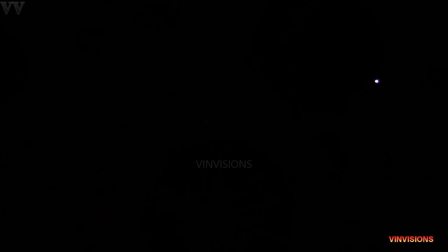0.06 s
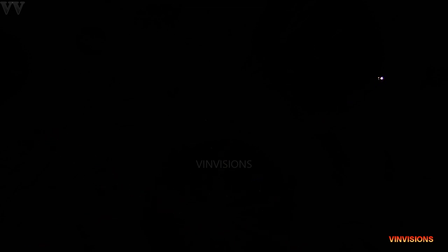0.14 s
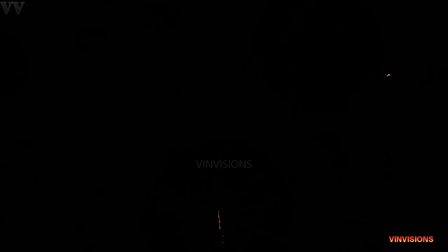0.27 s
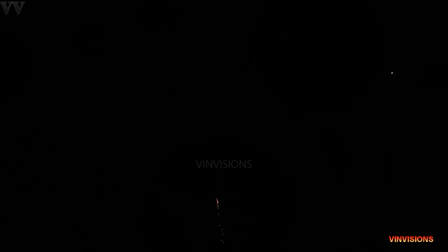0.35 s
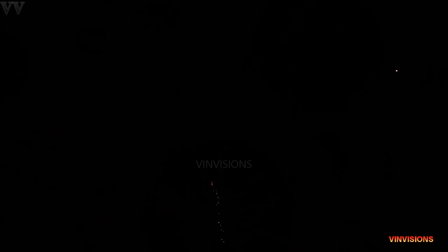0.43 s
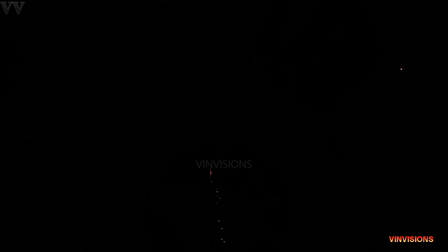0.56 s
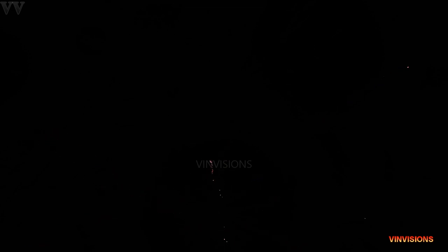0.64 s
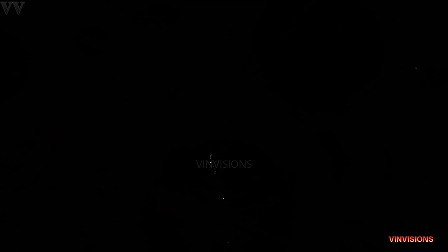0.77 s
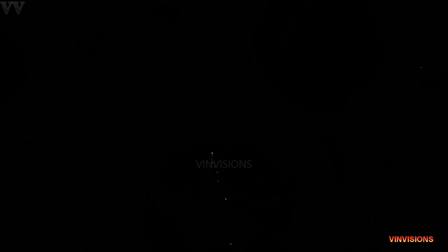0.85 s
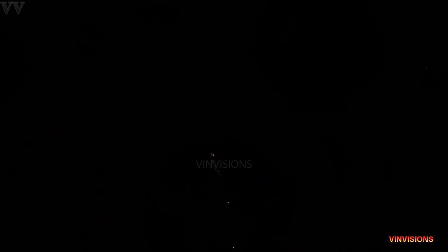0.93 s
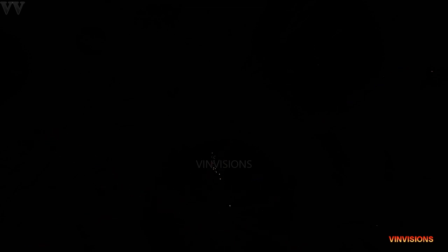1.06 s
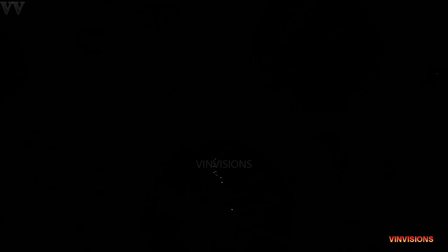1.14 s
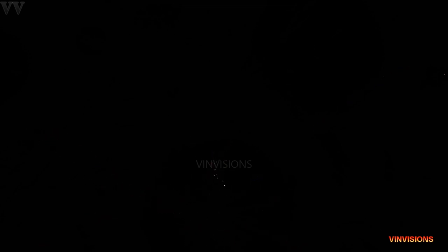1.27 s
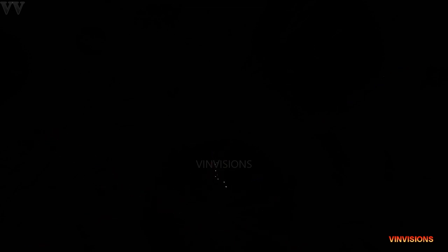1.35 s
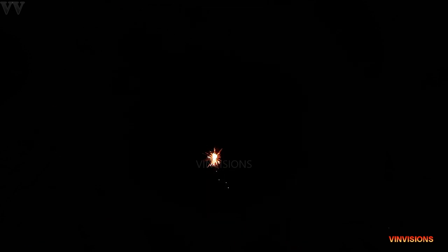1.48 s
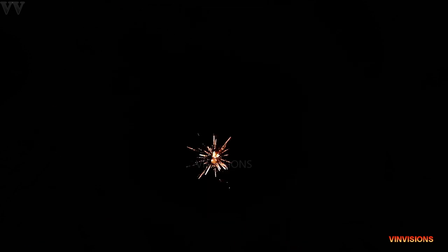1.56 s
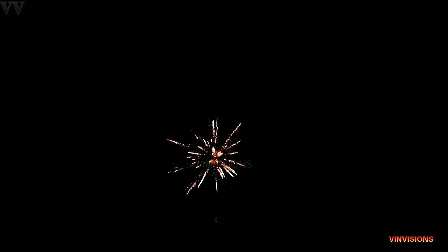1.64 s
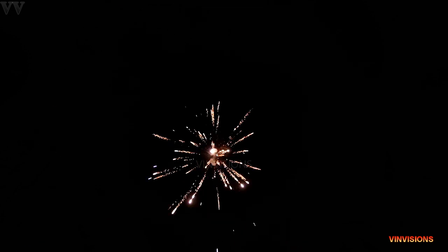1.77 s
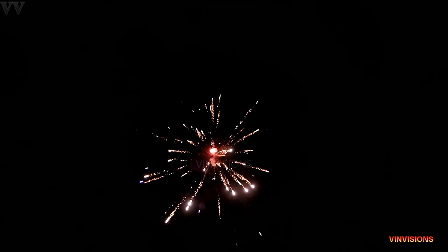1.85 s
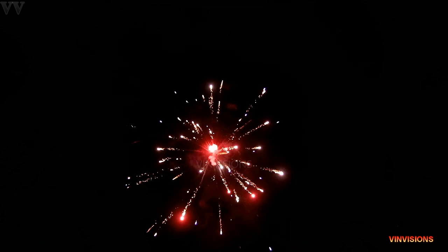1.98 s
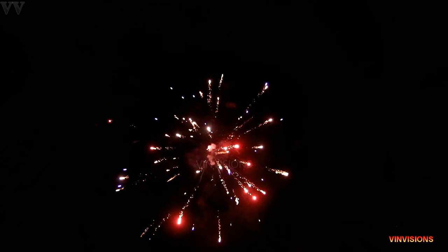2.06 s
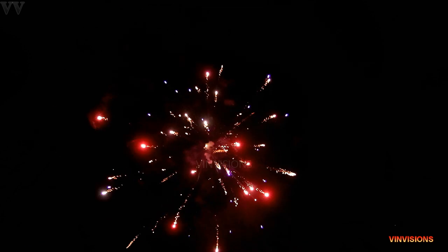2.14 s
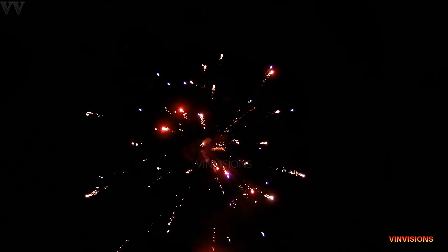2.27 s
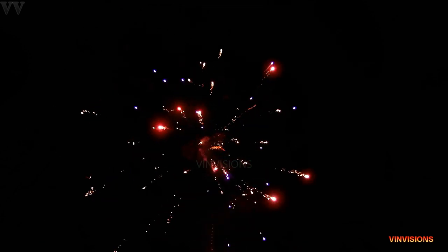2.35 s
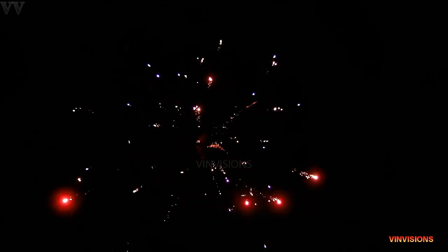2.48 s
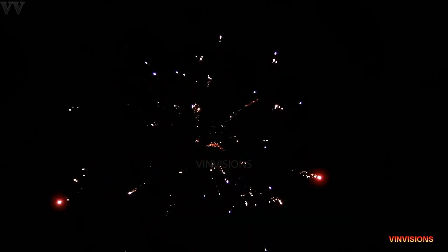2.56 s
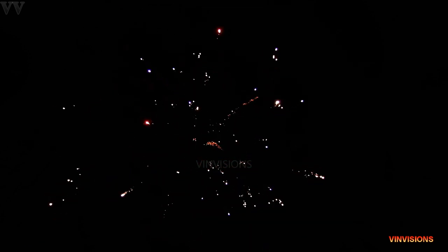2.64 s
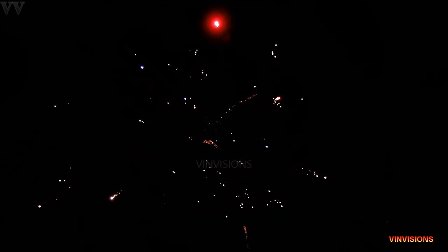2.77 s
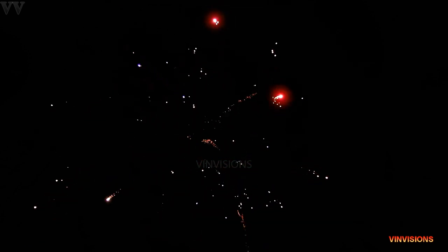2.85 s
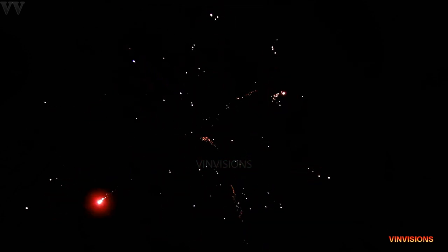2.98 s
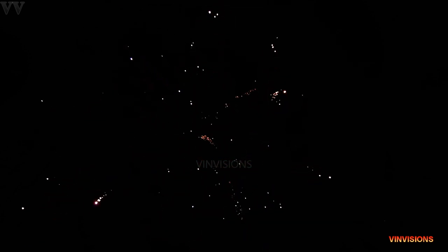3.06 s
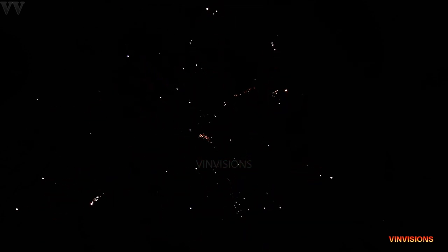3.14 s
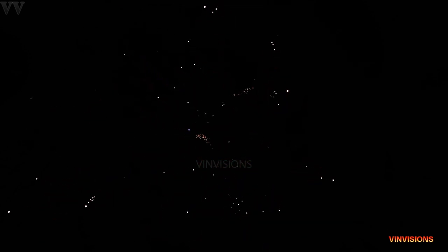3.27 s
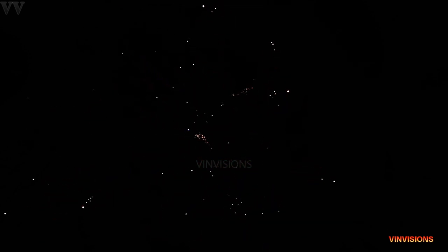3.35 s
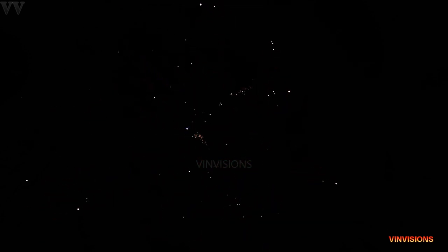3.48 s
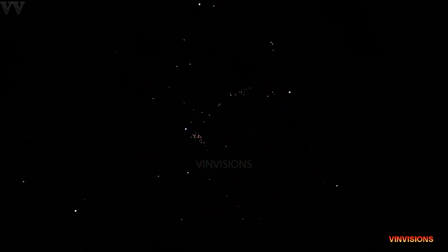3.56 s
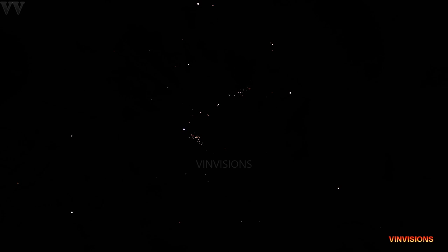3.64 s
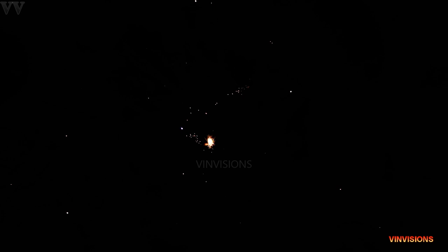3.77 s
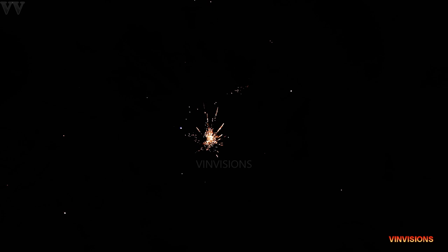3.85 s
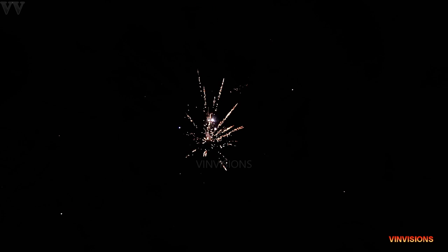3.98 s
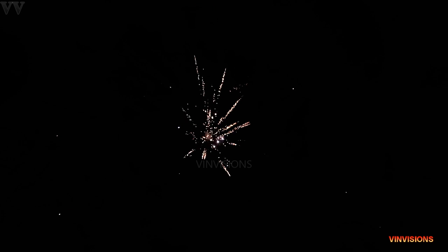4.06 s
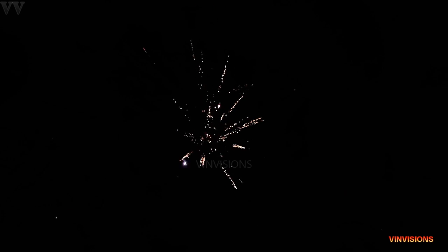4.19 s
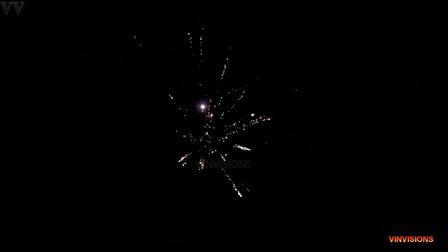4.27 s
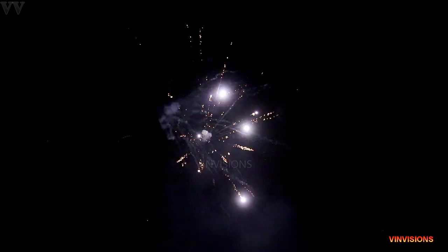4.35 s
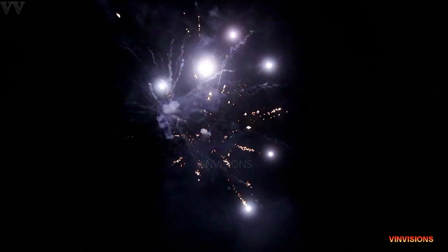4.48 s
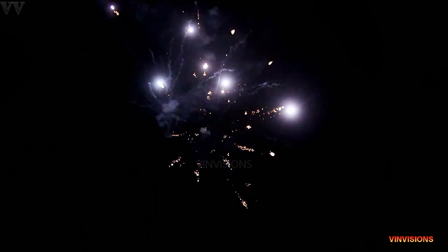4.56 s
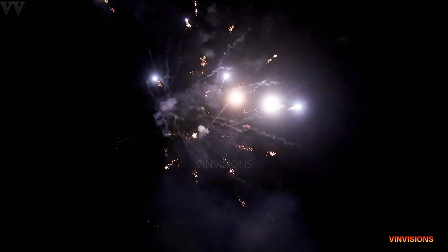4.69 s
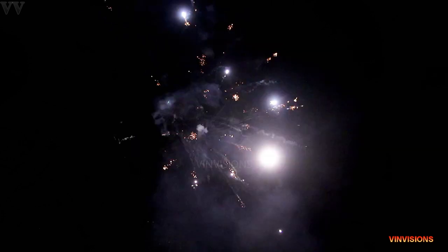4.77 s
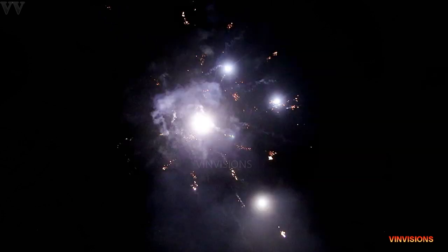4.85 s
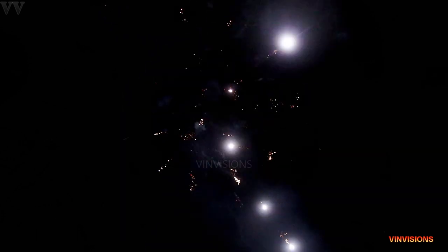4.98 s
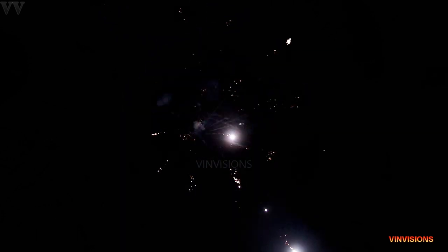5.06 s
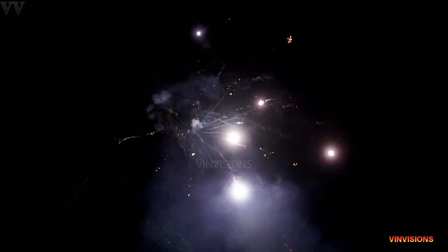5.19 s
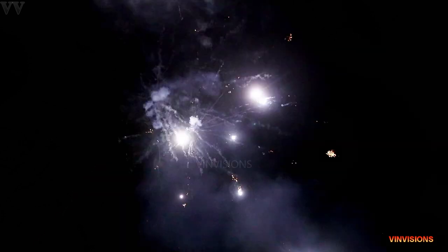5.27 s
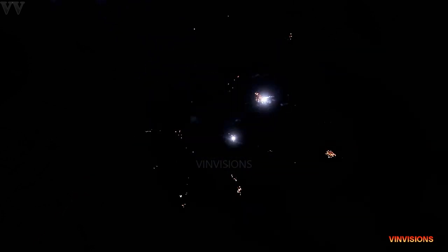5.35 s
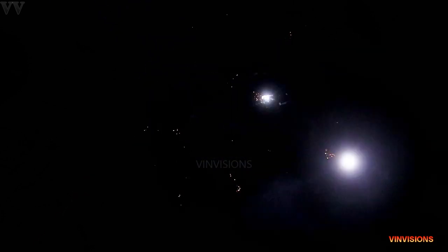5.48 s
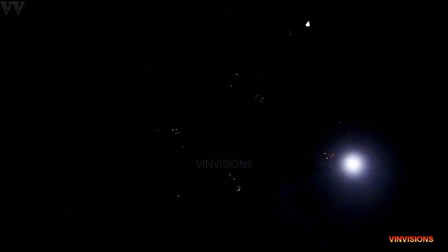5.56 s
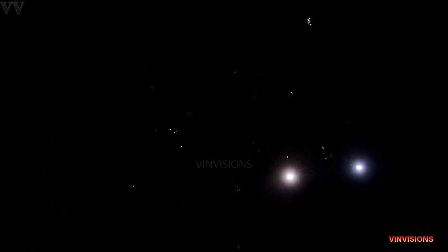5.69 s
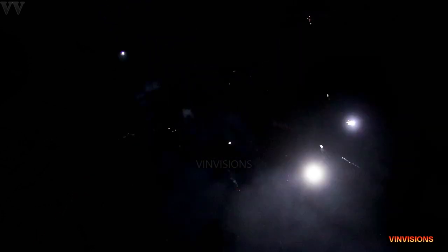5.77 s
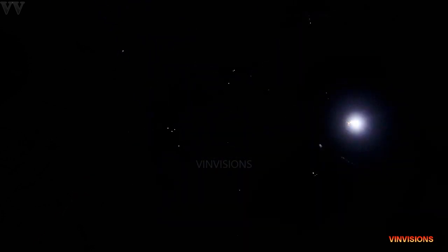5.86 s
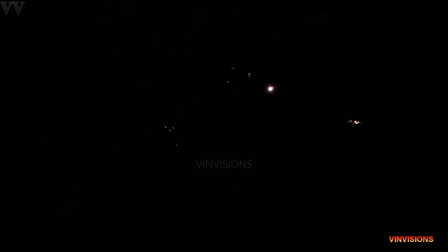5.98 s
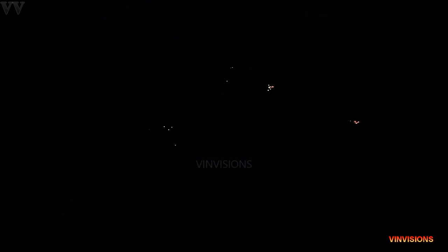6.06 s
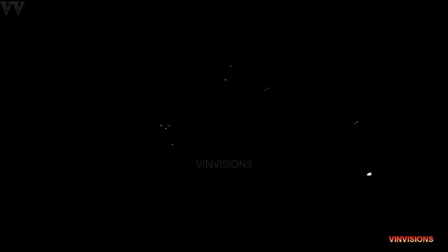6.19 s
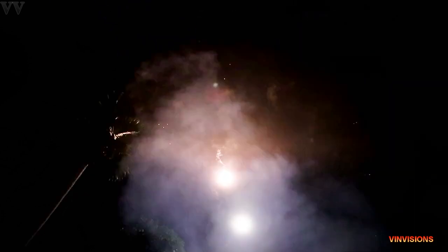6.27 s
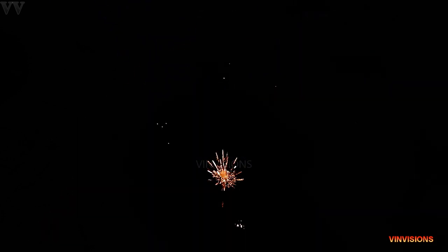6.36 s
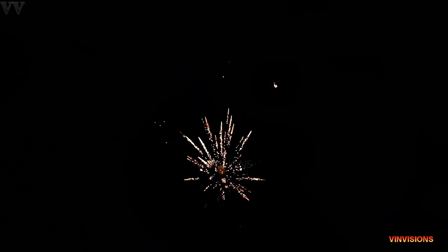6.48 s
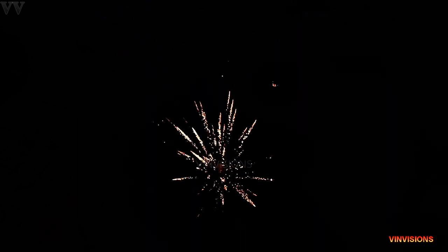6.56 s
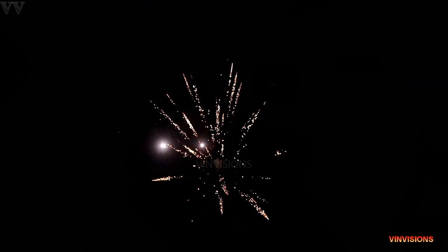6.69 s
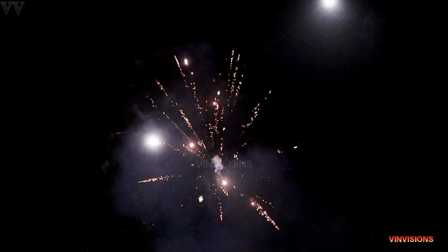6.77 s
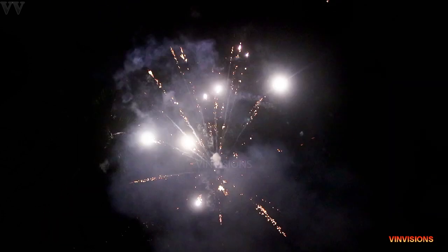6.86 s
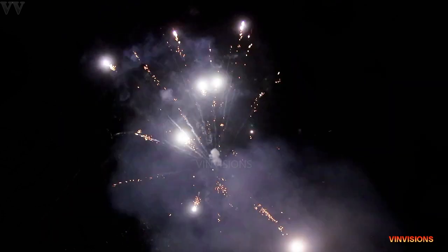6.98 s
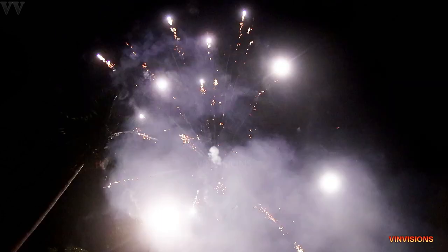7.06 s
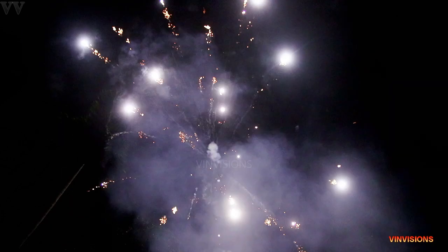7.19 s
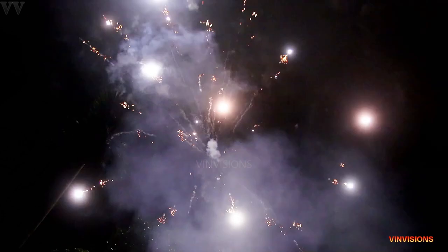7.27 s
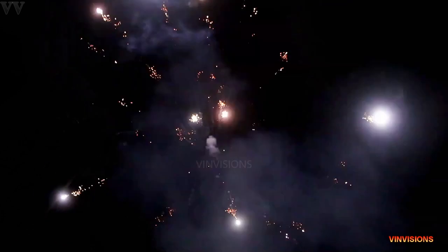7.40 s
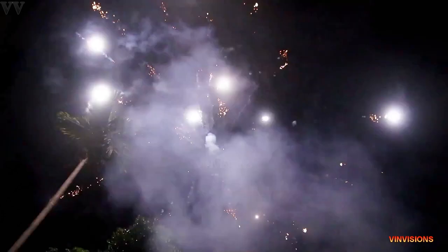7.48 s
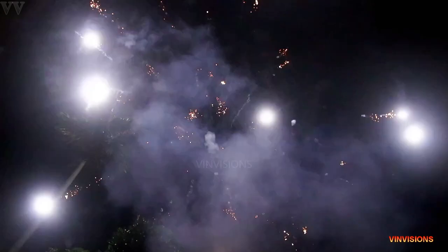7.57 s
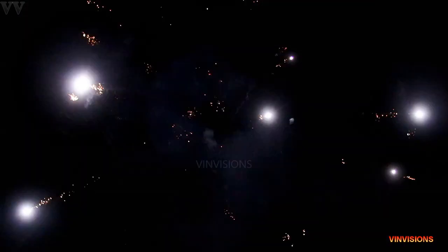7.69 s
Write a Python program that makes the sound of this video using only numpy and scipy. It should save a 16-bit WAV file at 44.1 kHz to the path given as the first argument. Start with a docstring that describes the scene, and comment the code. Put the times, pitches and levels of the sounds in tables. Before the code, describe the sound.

Three shells burst overhead about two and a half seconds apart, each a hard, distorted crack with a tearing edge, knocks from house fronts and a decaying roar. Hollow, gassy launch thumps come between them, with shorter echoes. Quiet fuse hiss, fine sizzling sparks, small falling chirps and muffled far fireworks fill the gaps. Wide stereo, open neighbourhood, close overloaded microphone.

```python
"""A firework cake bursts its shells overhead at night, close enough to overload the microphone.
Each burst is a shock wave with a ground bounce, tearing noise and a decaying diffuse field of echoes;
tubes launch the shells with a gas spit and a hollow resonant thump, whose echoes die sooner.
Shaped noise makes the fuse's hiss, the stars' sizzle, snapping sparks and a far wash over a rumble.
Far fireworks pop as band-limited shocks, and a small night animal chirps in falling sine whistles."""
import sys
import numpy as np
from scipy import signal
from scipy.fft import rfft, irfft, next_fast_len
from scipy.io import wavfile

SR = 44100
rng = np.random.default_rng(int(sys.argv[2]) if len(sys.argv) > 2 else 0)


def generate_wav(signal):
    """Clip the signal to [-1, 1] and save it as 16-bit WAV at the path in sys.argv[1]."""
    frames = np.transpose(np.atleast_2d(signal))
    scaled = np.clip(frames, -1, 1) * 32767
    pcm = np.round(scaled).astype(np.int16)
    wavfile.write(sys.argv[1], SR, pcm)


N = 340893
TIME = np.arange(N) / SR


def from_db(db):
    """Level definition: 20 dB is a factor of ten in amplitude."""
    return 10 ** (np.asarray(db) / 20)


def rms_one(x):
    """Normalisation to unit root-mean-square amplitude."""
    return x / np.sqrt(np.mean(x ** 2) + 1e-20)


def together(*gains):
    """Incoherent superposition: unrelated noises add in power."""
    return np.sqrt(sum(gain ** 2 for gain in gains))


def at_hz(points, hz):
    """Spectral interpolation: a table is read on a log-frequency axis."""
    known_hz, values = np.transpose(points)
    return np.interp(np.log(hz + 1), np.log(known_hz), values)


def add(out, s, sound):
    """Linear superposition: a sound starting at s seconds is summed into the mix."""
    start = round(s * SR)
    first, last = max(start, 0), min(start + sound.shape[-1], N)
    out[:, first:last] += sound[..., first - start:last - start]


def flutter(size, rate):
    """Random modulation: noise drawn `rate` times a second and interpolated, with rms 1."""
    step = np.arange(size) * rate / SR
    return rms_one(np.interp(step, np.arange(size), rng.standard_normal(size)))


def swell(age, peak_s):
    """Transient envelope: rises to 1 at peak_s and dies away."""
    phase = age / peak_s
    return (phase * np.exp(1 - phase)) ** 2


def flare(start_s, rise_s, hold_s, fade_db_per_s):
    """Combustion envelope: rises from 0 to 1, stays until hold_s after the start, then decays exponentially."""
    age = TIME - start_s
    fade = from_db(-fade_db_per_s * np.maximum(age - hold_s, 0))
    return np.clip(age / rise_s, 0, 1) * fade


def resonate(x, hz, width_hz):
    """Damped resonance: a two-pole filter with gain 1 at its peak."""
    r = np.exp(-np.pi * width_hz / SR)
    feedforward = np.array([1, 0, -1]) * (1 - r * r) / 2
    feedback = [1, -2 * r * np.cos(2 * np.pi * hz / SR), r * r]
    return signal.lfilter(feedforward, feedback, x + 1e-18)


# Correlation of the two ears in a diffuse field: (frequency [Hz], correlation [-1..1])
EAR_CORRELATION = [(60, 0.99), (250, 0.981), (500, 0.85), (1000, 0.29), (2200, -0.32), (4500, 0.035),
                   (15000, -0.061)]
# Level difference between the ears: (frequency [Hz], left minus right [dB])
EAR_BALANCE = [(80, -0.1), (500, -1), (2000, -1.7), (5000, -3), (14000, -3)]
# Resonances between nearby walls: (centre [Hz], width [Hz], boost [dB])
WALL_RESONANCES = [(237, 22, -0.5), (282, 6, 5), (390, 120, 1), (1270, 160, 2), (1435, 36, 1.5),
                   (2440, 90, 1.5)]


def diffuse(colour, size):
    """Diffuse field: noise from all round the yard, most alike between the ears in the bass; rms 1."""
    length = next_fast_len(size, True)
    hz = np.fft.rfftfreq(length, 1 / SR)
    mid, side = rfft(rng.standard_normal((2, length)))
    ears = np.array([[1], [-1]])
    alike = np.clip(at_hz(EAR_CORRELATION, hz), -1, 1)
    walls_db = sum(boost / (1 + (2 * (hz - centre) / width) ** 2)
                   for centre, width, boost in WALL_RESONANCES)
    gain = from_db(at_hz(colour, hz) + walls_db + ears * at_hz(EAR_BALANCE, hz) / 2)
    # the shares of mid and side set the correlation
    spectrum = np.sqrt(1 + alike) * mid + ears * np.sqrt(1 - alike) * side
    return rms_one(irfft(gain * spectrum, length)[:, :size])


def shock(age, push_s):
    """Blast wave: an instant jump in pressure, then a longer suction."""
    phase = np.maximum(age, 0) / push_s
    return (age >= 0) * (1 - phase) * np.exp(-phase)


def report(age, push_s, ring_hz, ring_width_hz, crack, ground_s, ground_db):
    """Image source: direct shock plus ground bounce, exciting a short hollow ring; the right ear leads."""
    lag_s = np.array([[.00015], [0]])  # left, right
    bounce = shock(age - lag_s - ground_s, push_s)
    wave = shock(age - lag_s, push_s) + from_db(ground_db) * bounce
    ringing = resonate(wave, ring_hz, ring_width_hz)
    return -(ringing / np.abs(ringing).max() + crack * wave)


def heave(age, turn_s, width_s):
    """Bulk air displacement: one slow swing follows a blast and rocks the microphone."""
    phase = (age - turn_s) / width_s
    return phase * np.exp((1 - phase ** 2) / 2)


def echoes(age, colour, loss, hold_s, bright_db, spread_s, fall, lumpy_db):
    """Reverberant decay: reflections weaken with path length, and each band is absorbed at its own rate."""
    size = len(age)
    hz = np.fft.rfftfreq(size, 1 / SR)
    octaves = np.log2(np.clip(hz, 60, 3000) / 600)
    field = rfft(diffuse(colour, size)) * from_db(bright_db * octaves)
    centres, out = np.array(loss)[:, 0], 0
    # overlapping bands that sum to the whole spectrum
    for (centre, db_per_s), share in zip(loss, np.eye(len(loss))):
        band = irfft(field * at_hz(np.c_[centres, share], hz), size)
        out = out + band * from_db(-db_per_s * age)
    spreading = (1 + np.maximum(age - hold_s, 0) / spread_s) ** -fall
    # single walls and trees stand out of the wash as lumps
    lumps = from_db(lumpy_db * (flutter(size, 350) + .5 * flutter(size, 45)))
    return out * spreading * lumps


def slaps(age, per_s, dull_hz, spread_s):
    """Specular reflection: whole house fronts throw the shock back as separate, dull knocks."""
    hits = rng.random(len(age)) < per_s / SR
    walls = hits * rng.uniform(0.47, 1, len(age)) * (age > .05)
    knock = resonate(shock(age[:SR // 50], 0.00072), dull_hz, 0.51 * dull_hz)
    weakened = walls * (1 + age / spread_s) ** -2
    return signal.fftconvolve(weakened, knock / np.abs(knock).max())[:len(age)]


# Relative spectrum of the far wash: (frequency [Hz], density [dB per Hz])
TOWN_COLOUR = [(20, -38.5), (85, -17), (150, -13.5), (250, -7), (390, -3), (580, -7.5), (750, -11.5),
               (1150, -20), (2500, -27), (3600, -49.5)]
# Relative spectrum of the low rumble: (frequency [Hz], density [dB per Hz])
RUMBLE_COLOUR = [(20, -16.5), (50, -6), (90, -4), (160, 1.5), (260, -6.5), (700, -46.5), (3000, -79.5)]
NIGHT_WASH_DB, NIGHT_RUMBLE_DB = -62, -69.5
ROLL_RISE_S, ROLL_HOLD_S, ROLL_FADE_DB_PER_S, ROLL_DB, ROLL_RUMBLE_DB = 1, 1.7, 6.5, -56.5, -65


def town():
    """Distant reverberation: an uneven wash and a low rumble swell as bursts roll back from the town."""
    roll = together(*[flare(s, ROLL_RISE_S, ROLL_HOLD_S, ROLL_FADE_DB_PER_S) for s, *_ in BURSTS])
    wash = together(from_db(NIGHT_WASH_DB), from_db(ROLL_DB) * roll) * from_db(1.0 * flutter(N, 30))
    rumble = together(from_db(NIGHT_RUMBLE_DB), from_db(ROLL_RUMBLE_DB) * roll)
    return wash * diffuse(TOWN_COLOUR, N) + rumble * diffuse(RUMBLE_COLOUR, N)


# Runs of animal chirps: (time [s], level of the first note [dB], number of notes)
CHIRP_RUNS = [(0.737, -63.5, 7), (6.097, -61, 3)]
CHIRP_PERIOD_S, CHIRP_END_HZ = .077, 3100
CHIRP_LOSS_DB = 2  # each note is weaker than the one before


def chirps(start_above=0.13, glide_s=0.021, swell_s=0.018, wet_db=-1):
    """Frequency modulation: runs of evenly spaced falling whistles, smeared by scattering surroundings."""
    out, age = np.zeros((2, N)), TIME[:SR // 3]
    for s, db, count in CHIRP_RUNS:
        for k in range(round(count)):
            glide = start_above * np.exp(-age / glide_s)
            pitch_hz = CHIRP_END_HZ * (1 + glide + 0.005 * flutter(len(age), 200))
            note = np.sin(2 * np.pi * np.cumsum(pitch_hz) / SR) * swell(age, swell_s)
            scatter = rng.standard_normal((2, len(age))) * np.exp(-age / .11)
            scatter = scatter / np.linalg.norm(scatter[0])
            wet = signal.fftconvolve(note[None], scatter, axes=1)[:, :len(age)]
            level = from_db(db - k * CHIRP_LOSS_DB)
            add(out, s + k * CHIRP_PERIOD_S, level * (note + from_db(wet_db) * wet))
    return out


# Far fireworks: (time [s], peak level [dB], sharpness [Hz], rolling echo level [dB]);
# the band's upper edge is twice the sharpness, and at least 600 Hz
FAR_POPS = [(0.781, -43, 350, -55), (3.676, -33, 300, -48.5), (4.594, -31.5, 1460, -56),
            (4.885, -30, 454, -56.5), (5.890, -38, 1100, -65), (5.9808, -36.5, 1300, -64),
            (6.095, -34, 1490, -60), (6.164, -42, 1400, -79), (6.318, -30, 596, -51.5),
            (6.361, -39, 700, -54.5), (7.410, -29.5, 303, -54), (7.519, -33, 1500, -53)]
POP_ROLL_S = 0.28  # decay time of the rolling echo


def far_pops():
    """Distance filtering: dulled blasts, each with a ground bounce, a short tail and a rolling echo."""
    out, age = np.zeros((2, N)), TIME[:SR]
    for s, peak_db, sharp_hz, roll_db in FAR_POPS:
        wave = shock(age, 0.00073) + from_db(-29) * shock(age - .0105, 0.00039)
        band_hz = [170, max(sharp_hz, 300) * 2]
        pop = signal.sosfilt(signal.butter(4, band_hz, "band", fs=SR, output="sos"), wave + 1e-18)
        short_tail = from_db(peak_db - 15) * np.exp(-age / 0.024)
        rolling = from_db(roll_db) * np.exp(-age / POP_ROLL_S)
        tail = together(short_tail, rolling) * diffuse(TOWN_COLOUR, len(age))
        add(out, s, tail - from_db(peak_db) * pop / np.abs(pop).max())
    return out


# Relative spectrum of the burning fuse: (frequency [Hz], density [dB per Hz])
FUSE_COLOUR = [(290, -31.5), (500, -9), (914, -8), (1390, -8.5), (1490, -10), (2760, -7), (4760, -16.5),
               (7430, -17), (9350, -21.5), (15400, -40.5)]
FUSE_LIT_S, FUSE_RISE_S, FUSE_HOLD_S, FUSE_FADE_DB_PER_S, FUSE_DB = 2.555, 0.8, 2.72, 22, -50
NIGHT_HISS_DB = -70.5


def fuse():
    """Turbulent gas noise: the fuse catches, burns on and dies down, over a faint steady hiss."""
    burn = from_db(FUSE_DB) * flare(FUSE_LIT_S, FUSE_RISE_S, FUSE_HOLD_S, FUSE_FADE_DB_PER_S)
    level = together(burn, from_db(NIGHT_HISS_DB))
    return level * from_db(.7 * flutter(N, 31)) * diffuse(FUSE_COLOUR, N)


# Relative spectrum of sparks and spitting gas: (frequency [Hz], density [dB per Hz])
SIZZLE_COLOUR = [(2000, -9), (3500, 3.5), (5500, -5.5), (8300, 2), (11500, -2), (15500, -10.5)]
# Spurts of sparks: (time of the middle [s], level [dB], Gaussian spread [s])
SPARK_SPURTS = [(0.522, -75, 0.021), (0.855, -60.5, 0.019), (1.01, -67, 0.0094), (5.854, -61, 0.02),
                (6.23, -62.5, 0.0014), (7.464, -60, 0.025)]
STARS_RISE_S, STARS_HOLD_S, STARS_FADE_DB_PER_S = .7, 1.5, 15.5
SNAPS_PER_S, SNAP_S, SNAP_DB, SNAP_SPREAD_DB = 12, .002, -69, 0.5
NIGHT_SIZZLE_DB = -69


def sparks():
    """Random impulsive noise: stars sizzle overhead after each burst; sparks spurt or snap now and then."""
    stars = [from_db(db) * flare(s, STARS_RISE_S, STARS_HOLD_S, STARS_FADE_DB_PER_S)
             for s, *_, db in BURSTS]
    sizzle = together(from_db(NIGHT_SIZZLE_DB), *stars)
    spurts = sum(from_db(db) * np.exp(-((TIME - s) / spread_s) ** 2 / 2)
                 for s, db, spread_s in SPARK_SPURTS)
    snap_levels = from_db(SNAP_DB + SNAP_SPREAD_DB * rng.standard_normal(N))
    born = (rng.random(N) < SNAPS_PER_S / SR) * snap_levels
    snaps = signal.lfilter([1], [1, -np.exp(-1 / (SNAP_S * SR))], born + 1e-18)
    grain = from_db(2.0 * flutter(N, 500) + 1.3 * flutter(N, 25))
    return (sizzle + spurts + snaps) * grain * diffuse(SIZZLE_COLOUR, N)


# Tubes firing: (time [s], thump level [dB], gas spit level [dB], echo level [dB], echo hold [s],
# bass heave level [dB], echo brightness [dB per octave], bass edge of the echoes [Hz])
LAUNCHES = [(-0.055, -16, -20, -12, 0.017, -45, 2.5, 300), (2.4847, 19, -9.5, -4.5, 0.038, -18.5, -1.1, 90),
            (5.164, 7, -7, -13.5, 0.03, -23.5, 0.88, 40)]
# Relative spectrum of the launch echoes: (frequency [Hz], density [dB per Hz])
LAUNCH_COLOUR = [(20, -35.5), (45, -16.5), (85, -11.5), (130, -11), (190, -7.5), (260, -8), (360, -3),
                 (470, -6.5), (620, -16.5), (1140, -17), (1800, -18), (3000, -16), (4900, -26),
                 (8300, -23.5), (15400, -40)]
# Loss of the launch echoes to air and ground: (frequency [Hz], loss [dB per s])
LAUNCH_LOSS = [(40, 8.5), (150, 36), (400, 12), (1200, 2.2), (3200, 19), (7500, 26), (14000, 17)]


def launches():
    """Tube resonance: gas spits past the shell, the uncorked tube rings, and low-lying echoes die soon."""
    out, age = np.zeros((2, N)), TIME[:SR]
    lead_s = .01
    for s, thump_db, spit_db, echo_db, hold_s, heave_db, bright_db, edge_hz in LAUNCHES:
        # the spit is strongest 1 ms before the thump
        spit = diffuse(SIZZLE_COLOUR, len(age)) * np.exp(-np.abs(age - lead_s + .001) / .0024)
        direct = report(age, push_s=0.0022, ring_hz=360, ring_width_hz=170, crack=0.62,
                        ground_s=0.013, ground_db=-26.0)
        wash = echoes(age, LAUNCH_COLOUR, LAUNCH_LOSS, hold_s, bright_db,
                      spread_s=0.22, fall=3.85, lumpy_db=1.1)
        wash = signal.sosfilt(signal.butter(2, edge_hz, "high", fs=SR, output="sos"), wash)
        swing = heave(age, turn_s=.028, width_s=0.0025)
        blast = from_db(thump_db) * direct + from_db(echo_db) * wash + from_db(heave_db) * swing
        add(out, s - lead_s, from_db(spit_db) * spit)
        add(out, s, blast)
    return out


# Shells bursting: (time [s], shock level [dB], tearing level [dB], echo level [dB], echo hold [s],
# bass heave level [dB], echo brightness [dB per octave], star sizzle level [dB])
BURSTS = [(1.629, 12.5, -23, -3.5, 0.004, -13, 1.5, -68.5), (3.957, 15.5, -5, -2.5, 0.0065, -17, 1, -67),
          (6.4365, 5.5, -4, -2.5, 0.035, 2, 1.5, -59)]
# Relative spectrum of the burst echoes: (frequency [Hz], density [dB per Hz])
BURST_COLOUR = [(20, -34), (40, -20), (80, -15.5), (130, -12), (180, -6.5), (260, -5), (400, -2.5),
                (600, -5.5), (900, -11), (1300, -11.5), (1850, -16.5), (2700, -17), (4700, -27),
                (8800, -26), (15400, -41)]
# Loss of the burst echoes to air and ground: (frequency [Hz], loss [dB per s])
BURST_LOSS = [(40, 2.5), (150, 9.5), (400, 3.5), (1200, 8), (3200, 17), (7500, 25.5), (14000, 39)]


def bursts():
    """Impulsive excitation: high in the air, each shock fills the whole neighbourhood with echoes."""
    out, age = np.zeros((2, N)), TIME[:SR * 2]
    for s, shock_db, tear_db, echo_db, hold_s, heave_db, bright_db, _ in BURSTS:
        direct = report(age, push_s=0.0006, ring_hz=428, ring_width_hz=260, crack=0.22,
                        ground_s=.0096, ground_db=-10)
        # the casing rips open just behind the shock
        tear = rng.standard_normal((2, len(age))) * swell(age, 0.0013)
        wash = echoes(age, BURST_COLOUR, BURST_LOSS, hold_s, bright_db,
                      spread_s=0.16, fall=2.357, lumpy_db=1.0)
        wash = wash + from_db(4.5) * slaps(age, per_s=28, dull_hz=554, spread_s=0.093)
        swing = heave(age, turn_s=0.022, width_s=0.0027)
        blast = from_db(shock_db) * direct + from_db(tear_db) * tear
        add(out, s, blast + from_db(echo_db) * wash + from_db(heave_db) * swing)
    return out


def scene():
    """Superposition: the shots sound over the quiet night."""
    return town() + chirps() + far_pops() + fuse() + sparks() + launches() + bursts()


CUTOFF_HZ = 15700


def record(dry):
    """Saturation: the blasts are flattened near full scale, then a steep low-pass cuts the top."""
    clipped = dry / (1 + np.abs(dry / .98) ** 8) ** (1 / 8)
    return signal.sosfilt(signal.ellip(10, .1, 70, CUTOFF_HZ, fs=SR, output="sos"), clipped)


dry = scene()
out = record(dry)
generate_wav(out)
```